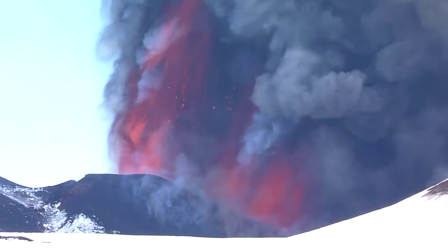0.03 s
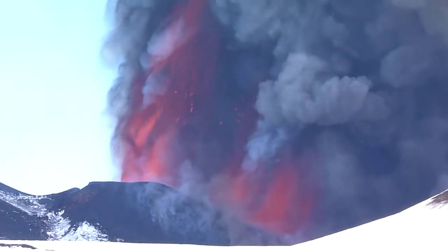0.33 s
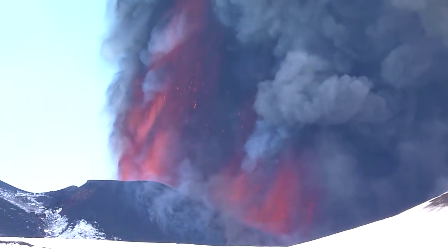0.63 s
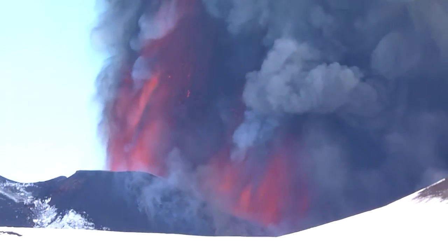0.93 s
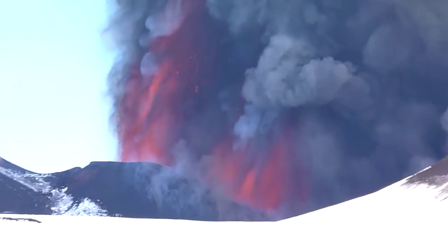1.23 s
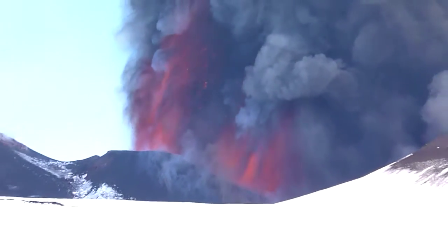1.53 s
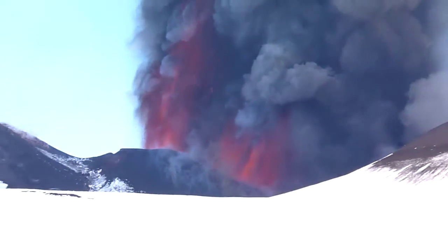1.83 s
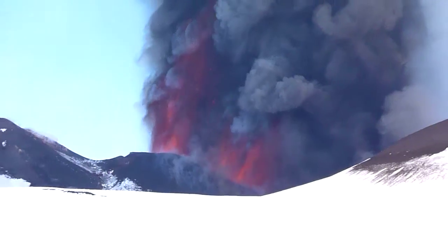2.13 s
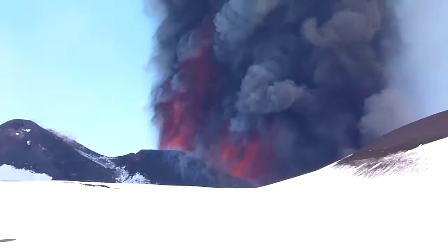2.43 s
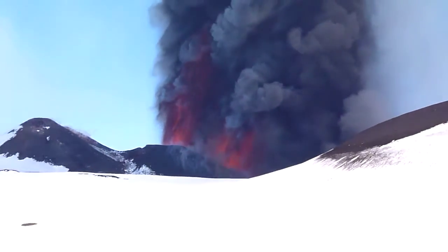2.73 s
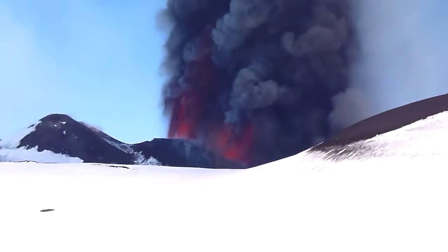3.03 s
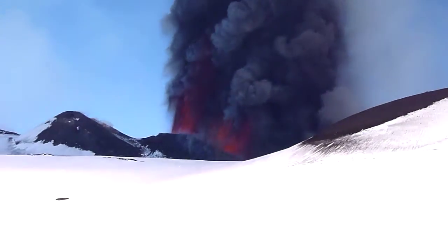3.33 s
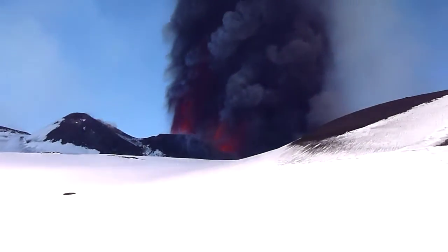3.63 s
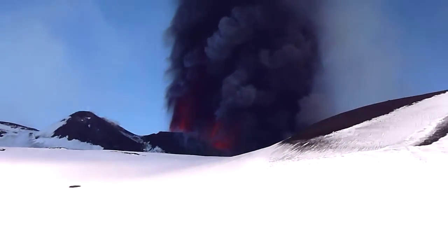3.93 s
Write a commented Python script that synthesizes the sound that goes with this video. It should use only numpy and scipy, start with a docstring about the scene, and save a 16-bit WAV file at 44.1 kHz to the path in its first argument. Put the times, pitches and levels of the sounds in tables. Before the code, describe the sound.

The deep, continuous roar of a volcanic eruption carries from far off outdoors, broken by dull thuds and a sharp crack halfway through. Light wind brushes the microphone as someone steps slowly nearby on the right, fabric rustling and gear clicking.

```python
"""Lava fountains beyond a snowfield

A distant turbulent jet gives a dull roar and a faint hiss over a deep rumble. Gas blasts, one of them
a sharper crack, arrive as pressure spikes followed by suction. In a light wind someone takes slow steps
close by on the right: friction makes clothing rustle and squeak, and impacts make gear clack and tick."""
import sys
import numpy as np
from scipy import signal
from scipy.fft import rfft, irfft
from scipy.io import wavfile
from scipy.ndimage import uniform_filter1d

SR = 44100
rng = np.random.default_rng(int(sys.argv[2]) if len(sys.argv) > 2 else 0)


def put_to_file(sound):
    """Save the sound as 16-bit audio at rate SR, in the file named by the first command-line argument."""
    columns = np.atleast_2d(sound).T  # one column per channel
    safe = np.clip(columns, -1, 1)
    whole_steps = np.round(safe * 32767)
    wavfile.write(sys.argv[1], SR, whole_steps.astype(np.int16))


N = 176400
T = np.arange(N) / SR
BIN_HZ = np.arange(N // 2 + 1) * SR / N
WALKER_PAN_DB, RIGHT_LEAD_S = -9.5, 3 / SR  # the right side is louder and earlier
IMPACT_ATTACK_S = 0.00023


def from_db(db):
    """Amplitude grows tenfold for every 20 dB."""
    return 10 ** (np.asarray(db) / 20)


def rms_one(x):
    """Dividing by the root mean square gives unit power."""
    return x / np.sqrt(np.mean(x ** 2) + 1e-20)


def envelope(rows):
    """Amplitude envelope, linear in decibels between (time_s, level_db) rows."""
    return from_db(np.interp(T, *np.transpose(rows)))


def colour(x, points):
    """Minimum-phase filter of unit power gain, shaped by (frequency_hz, level_db) points."""
    hz, db = np.transpose(points)
    f = np.maximum(BIN_HZ, 1)
    beyond = np.abs(np.log(f / np.clip(f, hz[0], hz[-1])))
    gain = rms_one(from_db(np.interp(np.log(f), np.log(hz), db)) * np.exp(-2 * beyond))
    cepstrum = irfft(np.log(gain + 1e-9), N)
    cepstrum[1:N // 2] *= 2  # folding the cepstrum makes the filter causal
    cepstrum[N // 2 + 1:] = 0
    return irfft(rfft(x) * np.exp(rfft(cepstrum)), N)


def drift(rate_hz):
    """Low-passed noise gives a random fluctuation of unit power."""
    return rms_one(irfft(rfft(rng.standard_normal(N)) / (1 + (BIN_HZ / rate_hz) ** 2), N))


def grainy(per_s, share, spread_db):
    """Shot noise: impulses of uneven size carry a share of the power, smooth noise the rest."""
    sizes = from_db(spread_db * np.minimum(rng.exponential(1, N), 4)) * rng.choice([-1, 1], N)
    grains = rms_one(sizes * (rng.random(N) < per_s / SR))
    return np.sqrt(share) * grains + np.sqrt(1 - share) * rng.standard_normal(N)


def steady(x, span_s):
    """Dividing by the running RMS evens out swells longer than the span."""
    return x / np.sqrt(uniform_filter1d(x ** 2, int(span_s * SR)) + 1e-12)


def from_right(x, lead_s):
    """Path difference: sound from the right reaches the left side later."""
    return np.array([np.interp(T - lead_s, T, x), x])


def place(x, pan_db, diffuse, lead_s=RIGHT_LEAD_S):
    """Level and time differences give direction; uncorrelated noise is the diffuse share of power."""
    sides = from_db(np.array([[pan_db], [-pan_db]]) / 2)
    direct = np.sqrt(1 - diffuse) * from_right(x, lead_s)
    return sides / sides.mean() * (direct + np.sqrt(diffuse) * rng.standard_normal((2, N)))


def wind():
    """Light, lumpy wind: local pressure fluctuations are uncorrelated between the two sides."""
    # frequency_hz, level_db
    spectrum = [(15, -12.5), (60, 11.5), (140, 5), (280, -13), (600, -24), (1000, -32.5)]
    noise = colour(rng.standard_normal((2, N)), spectrum)
    return from_db(-45 + 2 * drift(3)) * noise


def jet_hiss():
    """Fine turbulence in the jet hisses faintly, flaring around the strongest blasts."""
    # flares of hiss: start_s, length_s, level_db
    flares = [(1.858, .04, -51), (1.97, 0.1, -53.5)]
    # spectrum of the hiss: frequency_hz, level_db
    spectrum = [(500, -12.5), (1150, -3.5), (1450, -3), (1800, 1.5), (2100, -4.5), (2350, -7), (2800, -4.5),
                (4000, -15), (6500, -14.5), (8000, -33.5)]
    attack_s, release_s, floor_db = 0.014, 0.037, -58.5
    flaring = np.zeros(N)
    for start_s, length_s, db in flares:
        rise = np.clip((T - start_s) / attack_s + .5, 0, 1)
        fall = np.clip((start_s + length_s - T) / release_s + .5, 0, 1)
        flaring += from_db(db) * rise * fall
    gain = np.hypot(flaring * from_db(1.6 * drift(18)), from_db(floor_db))
    noise = place(grainy(per_s=700, share=0.29, spread_db=2), pan_db=1.0, diffuse=0.71, lead_s=0)
    return gain * colour(noise, spectrum)


def clothing_rustle():
    """Friction and creasing of fabric give strokes of noise whose bands flutter independently."""
    # strength of the rubbing: time_s, level_db
    strokes = [(0, -50.5), (.08, -53.5), (.17, -54), (.32, -53), (.62, -52), (.69, -47), (.74, -48),
               (.79, -45), (.83, -51), (.885, -46.5), (.97, -51), (1.05, -55.5), (1.15, -53), (1.31, -56.5),
               (1.365, -46.5), (1.41, -53.5), (1.48, -46), (1.595, -45), (1.625, -52.5), (1.68, -42),
               (1.77, -53.5), (1.88, -52.5), (1.93, -60), (2.0, -54), (2.19, -62), (2.28, -51.5),
               (2.37, -55.5), (2.46, -60), (2.54, -52), (2.61, -59.5), (2.78, -55), (2.94, -50.5),
               (3.0, -56), (3.12, -49), (3.17, -47), (3.22, -51.5), (3.32, -52), (3.38, -62.5), (3.55, -49),
               (3.72, -57.5), (3.79, -50.5), (3.88, -53.5), (3.97, -50)]
    # spectrum of the rustle: frequency_hz, level_db
    spectrum = [(500, -22.5), (1150, 2.5), (1500, 2.5), (2100, 3), (2750, -2), (3600, 0), (4700, -3.5),
                (5500, -4), (6600, -6.5), (7400, -14), (8200, -42.5)]
    band_spacing_hz = 550
    creases = place(grainy(per_s=500, share=0.51, spread_db=1.5), WALKER_PAN_DB, diffuse=0.068)
    flutter = from_db(-1 + 1.48 * drift(21))
    rustle_bins = rfft(colour(creases * envelope(strokes) * flutter, spectrum))
    out = np.zeros((2, N))
    for k in range(17):
        band = np.maximum(1 - np.abs(BIN_HZ / band_spacing_hz - k), 0)
        out += irfft(rustle_bins * band, N) * from_db(3.5 * drift(23) - 1)
    return out


def fabric_squeaks():
    """Ribbed fabric sliding on itself sings in a narrow band whose pitch sinks as the sliding slows."""
    # squeaks: start_s, length_s, pitch_hz, level_db
    squeaks = [(1.58, 0.03, 4400, -47.5), (1.685, 0.2, 3300, -59.5), (1.722, 0.11, 5080, -59)]
    width_hz, sag_hz_per_s = 220, 1500
    out = np.zeros(N)
    for start_s, length_s, hz, db in squeaks:
        age = np.clip(T - start_s, 0, length_s)
        phase = 2 * np.pi * np.cumsum(hz - sag_hz_per_s * age) / SR
        rough_tone = drift(width_hz) * np.sin(phase) + drift(width_hz) * np.cos(phase)
        out += from_db(db) * np.sin(np.pi * age / length_s) * rough_tone
    return place(out, WALKER_PAN_DB, diffuse=0)


def struck(taps, modes):
    """Modal ringing: each tap excites damped sinusoids, each with a randomly varied strength."""
    out = np.zeros(N)
    for start_s, db in taps:
        age = np.clip(T - start_s, 0, .2)
        attack = np.minimum(age / IMPACT_ATTACK_S, 1)
        for hz, mode_db, t60_s in modes:
            decay = from_db(db + mode_db + rng.normal(0, 3) - 60 * age / t60_s)
            out += decay * attack * np.sin(2 * np.pi * hz * age)
    return place(out, WALKER_PAN_DB, diffuse=0)


def gear_clacks():
    """Impacts give a short rattle with a faint tail and excite the resonances of the hollow gear."""
    # impacts, loudest once in each stride: start_s, level_db
    clacks = [(0.0155, -28.5), (0.413, -39.5), (0.6729, -37.5), (0.692, -31.5), (0.7577, -28.5),
              (0.7712, -25), (0.8799, -36.5), (0.9692, -38), (0.998, -40), (1.4386, -33), (1.4755, -35.5),
              (1.5184, -29.5), (1.5578, -21.5), (1.8746, -36.5), (2.3476, -36.5), (2.3615, -31.5),
              (3.031, -33), (3.063, -33.5), (3.1468, -24), (3.471, -37.5), (3.908, -32.5), (3.9225, -27),
              (3.9689, -39)]
    # spectrum of the rattle: frequency_hz, level_db
    spectrum = [(350, -19), (800, -12.5), (1150, 0.5), (1450, -3), (1800, 1.5), (2800, -10), (3600, -4.5),
                (5400, -9.5), (6600, -10), (7500, -20), (8500, -40)]
    # modes of the hollow body: frequency_hz, level_db, t60_s
    body_modes = [(1123, -13, 0.027), (1765, -8.5, 0.012), (3740, -13.5, 0.0055)]
    rattle_db, hold_s, burst_t60_s = -7.5, 0.001, 0.034
    tail_db, tail_t60_s = -18, .09
    force = np.zeros(N)
    for start_s, db in clacks:
        age = np.maximum(T - start_s, 0)
        attack = np.minimum(age / IMPACT_ATTACK_S, 1)
        burst = from_db(-60 * np.clip((age - hold_s) / burst_t60_s, 0, 3))
        tail = from_db(tail_db - 60 * np.minimum(age / tail_t60_s, 3))
        force += from_db(db + rattle_db) * attack * (burst + tail)
    rattle = place(grainy(per_s=3400, share=0.17, spread_db=3.0), WALKER_PAN_DB, diffuse=0.48)
    return colour(force * rattle, spectrum) + struck(clacks, body_modes)


def fastener_ticks():
    """A small fastener ticks because its modes are high and quickly damped."""
    # taps on the fastener: start_s, level_db
    ticks = [(1.1398, -40.5), (1.1707, -33), (1.1892, -28), (1.2134, -28.5), (1.257, -32)]
    # its modes: frequency_hz, level_db, t60_s
    modes = [(2250, -9, 0.018), (2170, -20.5, .02), (6600, -17, 0.011), (6800, -17.5, 0.012)]
    return struck(ticks, modes)


def gas_blasts():
    """A blast wave is a pressure spike followed by suction, its front rounded by the distance."""
    # blasts at the vent, and at 2.0155 s the crack's echo from the ground: time_s, level_db, front_cutoff_hz
    blasts = [(1.2255, -17, 446), (1.691, -16, 302), (1.7365, -14, 900), (1.8657, -4.5, 500),
              (1.8763, -18, 800), (2.0145, -3.5, 2530), (2.0155, -13.5, 2000), (2.283, -20, 350),
              (2.582, -7.5, 447), (2.673, -17, 496), (3.6162, -11, 358)]
    width_s, suction_delay_s, suction_ratio, low_cut_hz = 0.00065, 0.0018, 0.78, 129
    out = np.zeros(N)
    for time_s, db, front_hz in blasts:
        spike = np.exp(-np.abs(T - time_s) / width_s)
        suction = suction_ratio * np.exp(-((T - time_s - suction_delay_s) / width_s) ** 2)
        rounding = signal.butter(1, front_hz, fs=SR, output="sos")
        out += from_db(db) * signal.sosfilt(rounding, spike - suction + 1e-18)
    return signal.sosfilt(signal.butter(1, low_cut_hz, "high", fs=SR, output="sos"), out)


def lava_fountains():
    """Jet noise: dense turbulent puffs roar over a deep rumble and gas blasts, slightly to the right."""
    # spectrum of the roar: frequency_hz, level_db
    roar_spectrum = [(90, -32.5), (170, -5), (215, -1), (260, 0.5), (310, -1.5), (368, -4), (430, -10.5),
                     (520, -23), (900, -64)]
    # strength of the roar: time_s, level_db
    roar_level = [(0, -25.5), (.12, -26), (.45, -27.5), (.75, -27.5), (.98, -23), (1.06, -25),
                  (1.24, -20.5), (1.33, -22.5), (1.48, -25), (1.62, -25), (1.7, -20), (1.79, -25),
                  (1.875, -19.5), (1.94, -23), (2.03, -22.5), (2.13, -26), (2.27, -21.5), (2.33, -23.5),
                  (2.5, -23.5), (2.64, -20.5), (2.78, -26.5), (2.89, -24.5), (3.0, -27.5), (3.25, -23.5),
                  (3.46, -25), (3.62, -20.5), (3.67, -23.5), (3.8, -25), (3.93, -21), (4, -27)]
    # spectrum of the roar's upper edge: frequency_hz, level_db
    edge_spectrum = [(350, -13), (470, 1), (530, -0.5), (610, 1.5), (760, -8), (950, -20.5), (1400, -28),
                     (3000, -64)]
    # strength of that edge: time_s, level_db
    edge_level = [(0.0, -31.5), (0.02, -41), (1.02, -39), (1.25, -35), (1.29, -40), (1.73, -35),
                  (1.78, -38), (1.86, -36.5), (2.16, -42), (2.21, -39), (3.85, -40.5), (4.0, -41.5)]
    # spectrum of the rumble: frequency_hz, level_db
    rumble_spectrum = [(10, -28), (22, -15.5), (36, -9.5), (52, -6), (70, 3), (130, 3), (170, 2.5),
                       (260, -20), (600, -48.5)]
    # strength of the rumble: time_s, level_db
    rumble_level = [(0, -24), (.1, -27), (.55, -27.5), (.85, -27.5), (1.25, -24.5), (1.5, -26.5),
                    (1.88, -23), (2.16, -20.5), (2.22, -25.5), (2.27, -13.5), (2.33, -24), (2.6, -25),
                    (2.8, -27), (3.2, -25.5), (3.5, -25.5), (3.8, -23.5), (4, -23.5)]
    roar = steady(colour(grainy(per_s=260, share=0.24, spread_db=1.5), roar_spectrum), span_s=0.087)
    edge = steady(colour(grainy(per_s=600, share=0.25, spread_db=2), edge_spectrum), span_s=0.043)
    rumble = steady(colour(rng.standard_normal(N), rumble_spectrum), span_s=0.07)
    roar *= from_db(1.5) * envelope(roar_level)
    edge *= from_db(1) * envelope(edge_level)
    rumble *= from_db(-2.15) * envelope(rumble_level)
    return from_right(roar + rumble + gas_blasts(), lead_s=1.7 / SR) + from_right(edge, RIGHT_LEAD_S)


def scene():
    """Superposition: the far eruption, the wind and the near sounds of walking add as pressures."""
    return (lava_fountains() + wind() + clothing_rustle() + fabric_squeaks() + jet_hiss()
            + gear_clacks() + fastener_ticks())


def record(dry):
    """An elliptic low-pass filter cuts the treble steeply."""
    cutoff_hz = 7600
    return signal.sosfilt(signal.ellip(8, .2, 80, cutoff_hz, fs=SR, output="sos"), dry)


dry = scene()
out = record(dry)
put_to_file(out)
```